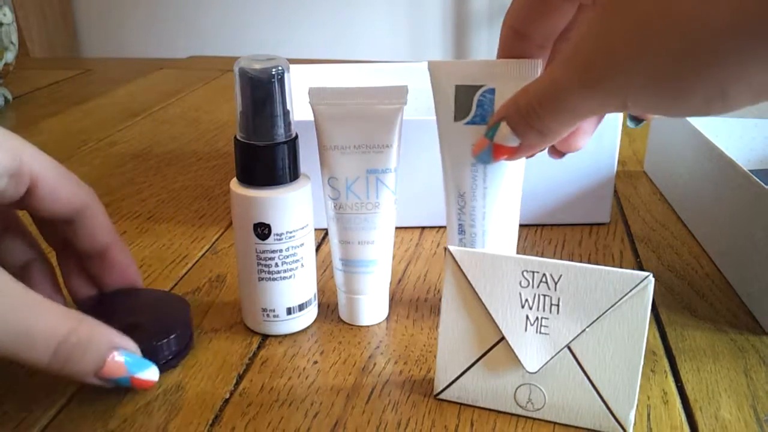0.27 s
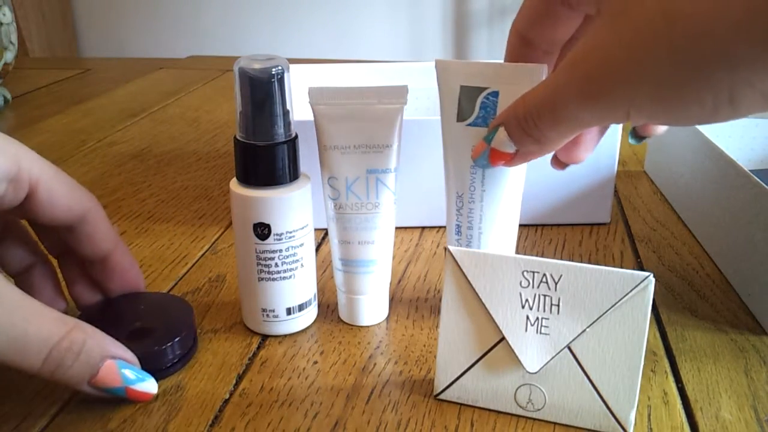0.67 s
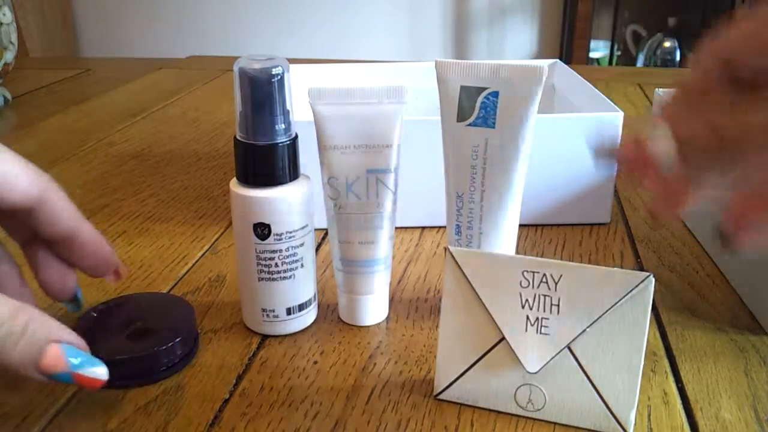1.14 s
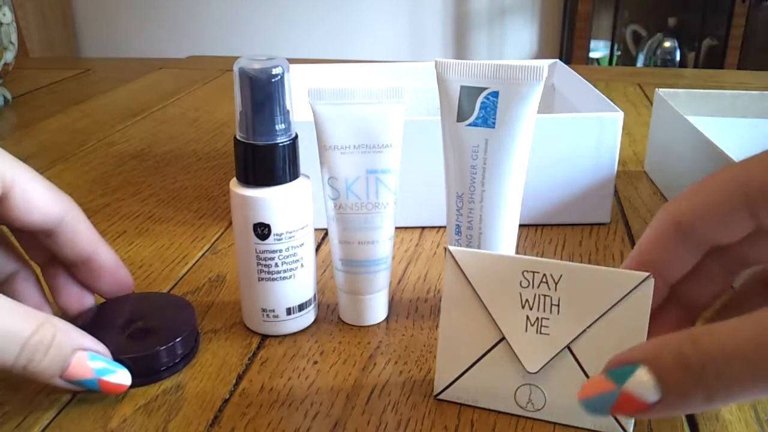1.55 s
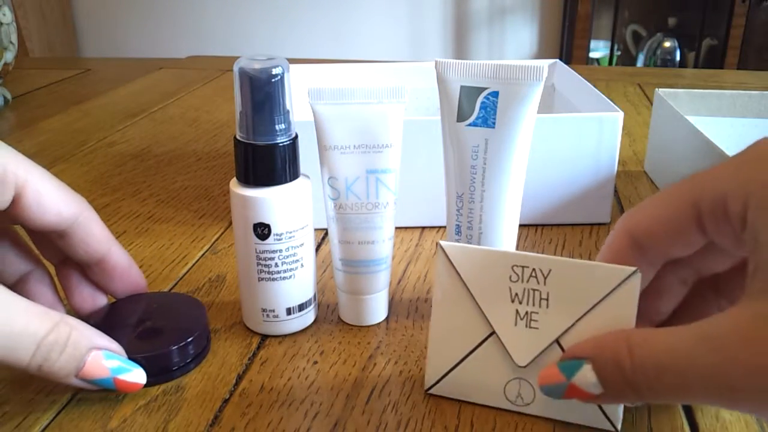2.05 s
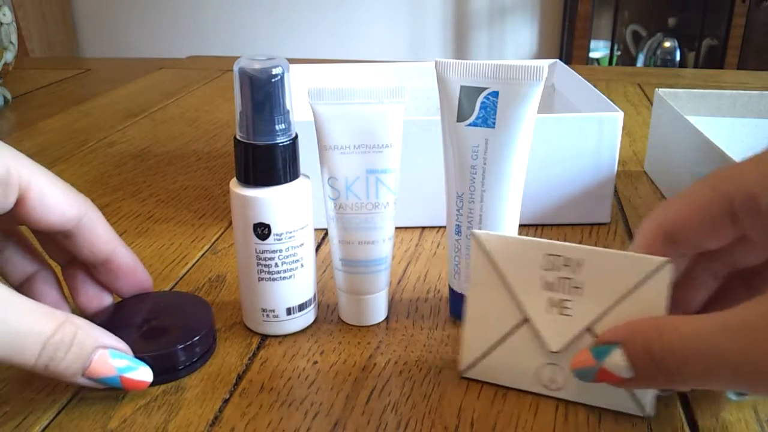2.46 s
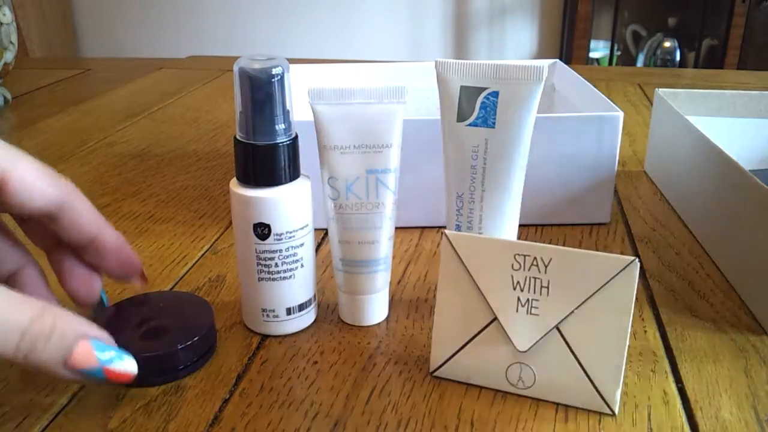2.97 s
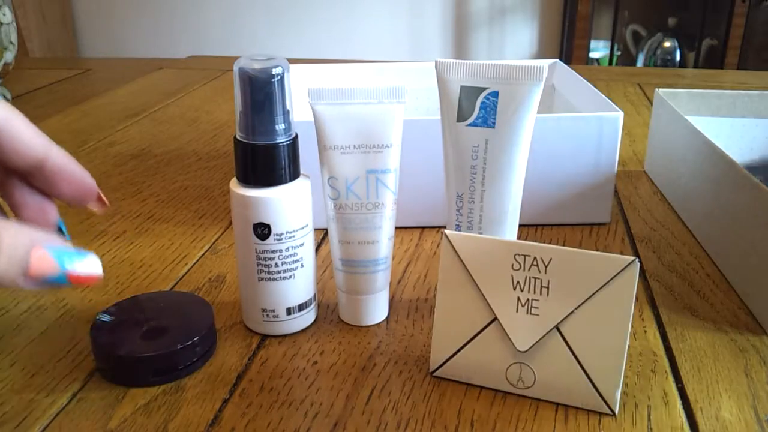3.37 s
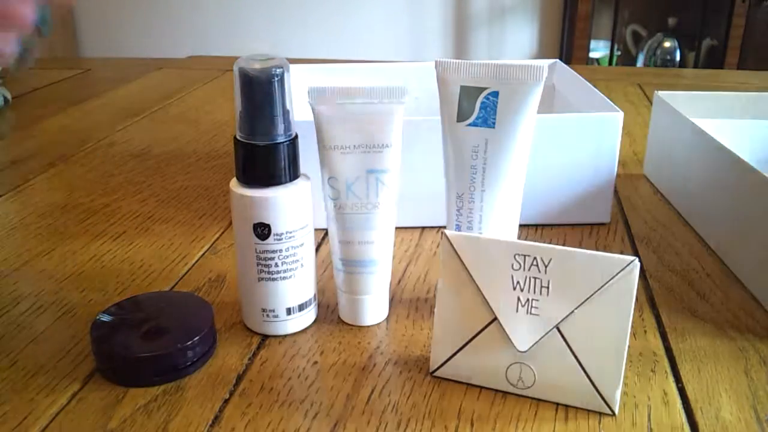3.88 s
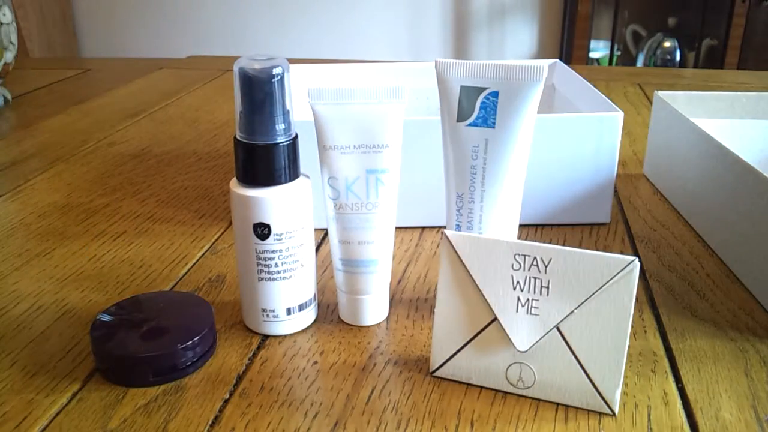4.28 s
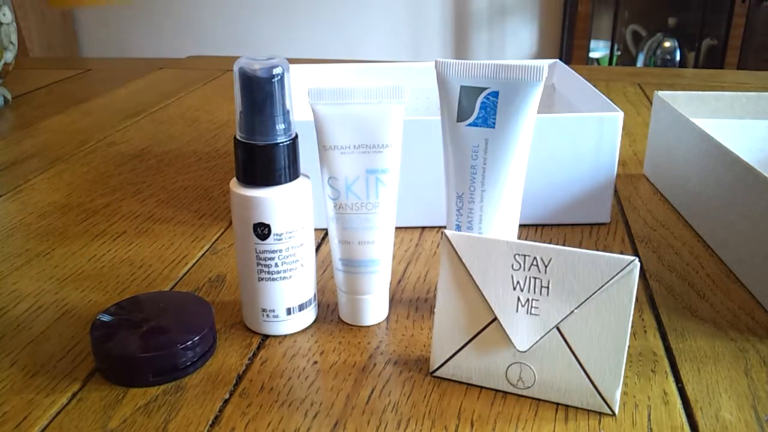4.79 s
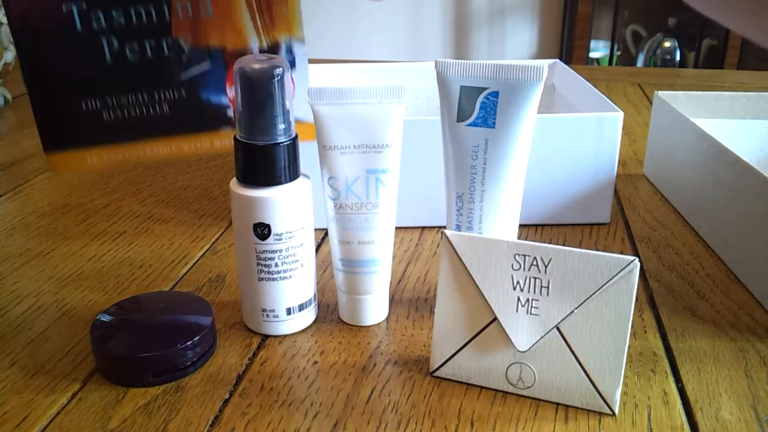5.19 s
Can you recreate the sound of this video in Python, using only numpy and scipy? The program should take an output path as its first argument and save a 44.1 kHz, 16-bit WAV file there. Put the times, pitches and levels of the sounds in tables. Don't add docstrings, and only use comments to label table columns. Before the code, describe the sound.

Close to the microphone, hands handle plastic and card on a wooden table. A sharp plastic clack comes first, then near quiet with faint slides and small taps. Midway, a busy burst of hollow card knocks and scraping peaks in a very loud dry snap, then fades into rustle, a knock and light clicks. Short room echo, steady hum and hiss, faint high ticking.

```python
import sys
import numpy as np
from scipy import signal
from scipy.io import wavfile
from scipy.ndimage import uniform_filter1d, minimum_filter1d

SR = 44100
rng = np.random.default_rng(int(sys.argv[2]) if len(sys.argv) > 2 else 0)


def natural_amplitude(level_db):
    exponent = np.asarray(level_db, float) / 20
    return 10 ** exponent


def generate_wav(signal):
    frames = np.transpose(np.atleast_2d(signal))
    scaled = np.clip(frames, -1, 1) * 32767
    pcm = np.round(scaled).astype(np.int16)
    wavfile.write(sys.argv[1], SR, pcm)


N = 240034

# (frequency [Hz], level [dB per Hz])
LEFT_FLOOR = [(25, -103), (70, -102), (160, -76.5), (280, -75), (450, -87), (700, -89.5), (1200, -94.5),
              (3000, -96), (6000, -103.5), (9000, -98), (11400, -93.5), (13500, -97.5), (15000, -100)]
RIGHT_FLOOR = [(25, -101), (70, -92.5), (160, -86), (280, -82.5), (450, -84.5), (700, -88.5), (1500, -91.5),
               (4000, -95.5), (6300, -91.5), (8500, -94.5), (15000, -94.5)]
# (frequency [Hz], likeness [-1 to 1])
FLOOR_LIKENESS = [(60, 0.38), (150, -0.57), (380, -0.47), (950, -0.039), (2380, 0.034), (5980, -0.0085),
                  (15000, -0.029)]
# (frequency [Hz], width [Hz], level [dB])
RIGHT_HUMPS = [(5550, 410, 3.5), (8000, 690, 1.5), (12000, 1400, 2)]
# (time [s], peak [dB], pitch [Hz])
STRONG_TICKS = [(0.116, -47, 12100), (0.1625, -51, 11800), (0.211, -50, 12000), (0.3252, -48, 11900),
                (0.3485, -45, 11700), (0.5343, -47, 11900), (0.5572, -47, 11600), (0.6037, -47, 12100),
                (0.72, -48, 12000), (0.8359, -57, 12000), (0.9287, -47, 11800), (0.9754, -46, 11700),
                (0.9983, -48, 11900), (1.3004, -52, 11900), (1.3468, -56, 11900), (1.4398, -50, 11900),
                (1.4899, -52, 12000), (1.5093, -47, 11900), (1.5326, -50, 11700), (1.5789, -45, 11900),
                (1.6025, -54, 11700), (1.6261, -51, 12000), (1.6486, -49, 12000), (1.6737, -45, 12200),
                (1.6955, -49, 11700), (1.8113, -54, 12200), (1.8615, -51, 11900), (1.904, -51, 11800),
                (1.9333, -49, 11900), (1.9506, -47, 11900), (1.9737, -48, 11700), (2.2726, -50, 12100),
                (2.8343, -54, 12100), (2.9967, -48, 12200), (3.1347, -49, 12100), (3.4901, -43, 12000),
                (3.817, -49, 11900), (4.042, -43, 11600), (4.2029, -52, 12300), (4.4118, -46, 11800),
                (4.4354, -49, 11600), (5.2526, -47, 12300), (5.2712, -45, 11900), (5.2941, -47, 11800),
                (5.3173, -48, 12100), (5.3448, -50, 12200), (5.4139, -48, 12000)]
# (frequency [Hz], gain [dB])
LEFT_PORT = [(50, -8), (130, 6), (300, 4), (700, 0), (2500, 0.5), (4000, -2), (5600, -8), (7000, -2.5),
             (9000, 0), (11800, 14), (14500, 3)]
RIGHT_PORT = [(50, -17), (130, -0.5), (300, -11), (700, -0.5), (2500, 0.5), (4000, 3.5), (4600, 6),
              (5050, 8), (5600, 7), (6300, 4), (9000, -6.5), (11600, 0), (14500, -14.5)]
# (frequency [Hz], time to fall 60 dB [s])
ROOM_DECAY = [(200, 0.11), (600, 0.33), (2000, 0.51), (5000, 0.18), (12000, 0.019)]
# (delay [s], level [dB])
ECHOES = [(.0042, -3.5), (.0085, -35), (.0125, -11), (.0155, -33), (.021, -14), (.027, -15.5)]
# (start [s], length [s], pitch [Hz], level [dB], steadiness [ratio])
SQUEAKS = [(1.17, 0.26, 3050, -66, .1), (2.45, 0.17, 5000, -63, .1), (3.325, 0.031, 4070, -46.5, .3),
           (3.488, 0.09, 2600, -46, .1), (3.49, 0.16, 5060, -46, .1), (4.538, 0.1, 3200, -62, 1.2),
           (4.499, 0.13, 5250, -67, .3), (4.6, 0.16, 3110, -53.5, 1.3), (4.626, .025, 5300, -54.5, .5),
           (4.741, 0.09, 3200, -58, 1.5), (4.632, .035, 3150, -53, 2), (4.77, .17, 2050, -59, .1),
           (2.08, 0.4, 7000, -62, .1)]
# (frequency [Hz], level [dB])
SCRAPE_COLOUR = [(1200, -1), (1700, 1.5), (2300, 1), (3100, 1), (4200, -0.5), (5000, -2), (5900, -4.5),
                 (7000, -4), (9000, -4), (12000, -43)]
BODY_COLOUR = [(90, -50), (150, -28), (300, -4.5), (500, -4.5), (900, -11.5), (1400, -11), (2200, -14)]
SHEEN_COLOUR = [(5000, -23), (8000, -2.5), (10000, -4), (12000, -4.5), (15000, -3.5)]
# (start [s], length [s], scrape [dB], body against scrape [dB], sheen against scrape [dB])
SLIDES = [(.4, 0.23, -64.5, 1, -3), (0.845, 0.62, -67, 6, -14), (2.048, 0.34, -64, -4, -6),
          (2.9, .28, -63, -1, -3), (2.409, 0.16, -55.5, 5, -3), (2.497, .13, -58, 4.5, -3),
          (3.19, 0.14, -44.5, 1, -7), (3.306, 0.19, -41.5, -5.5, -3.5), (3.406, 0.12, -43, -9, -4.5),
          (3.536, 0.15, -44.5, -13, 3), (3.66, 0.1, -47, -8, 3), (3.768, 0.31, -59, -1.5, -0.5),
          (4.013, 0.21, -60, -3.5, 3), (4.46, 0.15, -58, -6, -6), (4.56, 0.15, -49, -14, 1.5),
          (4.69, 0.21, -56.5, -4, -21), (4.848, 0.16, -59, -10, -14)]
# (start [s], time to fall 60 dB [s], scrape [dB], body against scrape [dB], sheen against scrape [dB])
SKIDS = [
    (0.308, 0.42, -44, -0.5, -5),
    (3.483, 0.17, -41, -23, 13),
    (3.487, 0.7, -31, -34, -6),
    (3.72, 0.18, -37, 3.5, -2.5),
    (4.39, 0.76, -50, -6, -1),
]
# (frequency [Hz], width [Hz], level [dB])
ITEM_MODES = [(2250, 270, 3), (3500, 260, -15), (2940, 120, -4), (1880, 170, 5), (1000, 360, 0),
              (465, 460, 2.5), (650, 38, 3.5), (1365, 120, 4.5)]
# (time [s], peak [dB], centre [Hz], rattle time to fall 60 dB [s], left over right [dB])
KNOCKS = [(0.3015, -32, 815, 0.033, 5), (.331, -38, 362, 0.19, -4), (2.3696, -39.5, 492, 0.021, -5),
          (2.555, -41.5, 710, 0.035, 0), (3.2141, -18.5, 1160, 0.0034, 3), (3.2225, -28, 810, 0.022, 0),
          (3.246, -36, 412, 0.12, -3), (3.371, -22.5, 1130, 0.094, 6), (3.463, -21.5, 1240, 0.062, 4.5),
          (3.72, -27, 920, 0.051, 7), (3.731, -34, 500, 0.04, -4), (3.749, -37, 360, 0.037, -4),
          (4.084, -46, 760, 0.025, 0)]
# (time [s], peak [dB], centre [Hz], width [octaves], left over right [dB])
CLICKS = [(0.2571, -32, 2370, 2, 4), (0.2981, -19, 3500, 2.9, -4), (.5335, -50, 7000, 0.37, -15),
          (0.6127, -45, 8000, 0.34, -17), (2.371, -33, 1880, 1.6, 2), (2.555, -40, 2000, 1.1, 4),
          (2.7534, -36.5, 1800, 1.7, 4.5), (3.2147, -31, 3990, 0.6, -8.5), (3.2382, -23, 3600, 1.34, -5),
          (3.278, -33, 3000, 0.78, 5), (3.371, -26, 4000, 1.7, -18), (3.383, -20.5, 2500, 2, -6),
          (3.466, -27, 4700, 0.31, -3), (3.4776, -22, 4960, 0.9, -1), (3.4792, -12.5, 5150, 0.8, -13),
          (3.4803, -26, 200, 1.9, -7.5), (3.4806, -9, 5250, 2.8, 8), (3.489, -28.5, 2630, 0.94, 27),
          (3.493, -17.5, 4020, 0.87, 16), (3.8953, -38, 3370, 0.38, -3), (3.911, -30.5, 3000, 3.4, -8),
          (4.042, -44, 11600, .55, -7), (4.3867, -32, 3000, 1.4, 3), (4.4203, -31.5, 3600, 0.92, 4),
          (4.4108, -42, 4500, 1.1, 1), (4.4972, -34, 3800, 1.33, -4), (4.5512, -41, 10600, .3, -2),
          (4.617, -32, 4200, 1.3, -3)]
# (time [s], peak [dB], pitch [Hz], left over right [dB])
PINGS = [(0.306, -38, 2250, 6), (.307, -42, 5700, -3), (0.312, -31, 1950, 11), (0.3139, -40, 950, 3),
         (.3185, -41, 900, -3), (.349, -44, 2100, 3), (.3772, -44, 1870, 2), (0.381, -43, 1900, 4),
         (.415, -50, 1900, -2), (0.32, -36, 7900, .8), (.3245, -38, 2200, 3), (.328, -37, 2150, 5),
         (.338, -37, 2200, 3), (2.3702, -51, 5100, -2), (2.753, -45, 2770, 2), (2.7527, -48, 5710, 8),
         (3.238, -30, 2240, -2), (3.2381, -40, 4870, -2), (3.2385, -32.5, 3170, -9), (3.238, -43, 5700, 0),
         (3.2773, -40, 4100, 0), (3.2784, -41, 2180, 0), (3.406, -34, 6450, -9), (3.4083, -31, 6300, -8),
         (3.409, -42, 11900, 3), (3.4348, -35, 5820, -8), (3.4356, -31.5, 5600, -11),
         (3.4353, -34, 11300, 0), (3.8945, -36, 4090, -7), (4.084, -46, 780, 6), (4.3888, -38, 1550, -1),
         (4.4206, -38, 4880, -2), (4.4208, -43, 3400, 1), (4.4972, -45, 3000, 4), (4.6172, -47, 2000, 4),
         (2.7532, -44, 1600, 4), (2.3703, -41, 2310, 2), (2.3705, -43.5, 1290, 2), (3.912, -45, 1100, 3),
         (4.4968, -41, 5400, -5)]
# (time [s], peak [dB], pitch
# [Hz], time to fall 60 dB [s], left over right [dB])
BUMP_RINGS = [(3.2875, -40, 402, .035, 3), (3.303, -43, 380, .05, 3), (2.37, -42, 427, 0.022, 3),
              (2.3821, -44, 392, 0.041, 1), (2.757, -46, 485, 0.017, 0), (3.2142, -21, 950, 0.012, -4),
              (3.215, -40, 1390, 0.012, 7), (3.2144, -27.5, 745, 0.019, -2), (3.2144, -32, 2100, 0.012, -3),
              (3.2185, -24, 1000, .012, -5), (3.249, -37, 254, 0.093, -3), (3.3712, -27, 800, .012, -4),
              (3.3715, -30, 1960, .012, -3), (3.373, -37.5, 266, 0.056, -2), (3.3727, -19, 477, 0.02, 2),
              (3.3735, -22, 1300, .016, -6), (3.3713, -21.5, 1075, .02, -2), (3.3825, -30, 1990, .02, 3),
              (3.3836, -32, 2450, 0.033, 3), (3.3828, -29, 1260, 0.018, 3), (3.386, -30, 470, 0.019, -1),
              (3.391, -31, 1000, 0.028, -1), (3.396, -30, 480, 0.027, -5), (3.41, -33, 1690, .025, 7),
              (3.4636, -26, 1193, .025, 9), (3.4632, -29, 2100, .012, 2), (3.4667, -22.5, 1160, 0.029, 2),
              (3.467, -28, 1770, 0.017, 3), (3.7194, -30, 1230, 0.0077, 10), (3.7215, -26, 652, 0.034, -12),
              (3.7204, -24, 1050, 0.018, 5.5), (3.7255, -32, 520, .025, 6), (3.7245, -30, 845, .015, 1),
              (3.725, -44, 258, 0.1, -2.5), (3.729, -30, 705, 0.017, 0), (3.7315, -29.5, 445, 0.041, 0),
              (3.7284, -26.5, 1150, .015, 5), (3.7336, -25, 1220, 0.012, 1), (3.7344, -37, 1574, 0.025, 9),
              (3.7499, -36.5, 400, .025, -2),
              (.298, -39, 330, .015, 2),
    (.3008, -32, 900, 0.014, 4),
    (0.3307, -41, 380, .025, 4),
    (.3365, -39, 420, .02, 2),
    (0.3442, -44, 370, 0.051, 4),
    (.364, -49, 400, 0.036, 2),
]
# (pitch [Hz], peak [dB], time to fall 60 dB [s], left over right [dB])
CASE_MODES = [(626, -35.5, 0.014, 6), (1030, -28, 0.0093, 0), (1680, -28, 0.012, 3),
              (2345, -23.5, 0.016, 4.5), (2830, -29.5, .013, -8), (3630, -21, 0.0081, -0.5),
              (4560, -25, 0.014, 3), (5200, -19.5, 0.0082, 6), (5860, -28, 0.0087, 0),
              (6750, -26, 0.008, 4), (7640, -27.5, .008, 7), (10350, -34.5, 0.0057, 3),
              (11570, -35, 0.0057, 1), (13200, -44, .004, 0)]
# (pitch [Hz], peak [dB], time to fall 60 dB [s], left over right [dB])
SNAP_MODES = [(1007, -19.5, 0.021, 0), (1350, -29, 0.012, 8), (2237, -8, 0.016, 3), (2920, -20, 0.017, -6),
              (3540, -15.5, 0.012, -10), (4150, -15.5, 0.014, -8), (4950, -7, 0.0082, -5),
              (5710, -16.5, 0.016, -4), (9480, -19, 0.0058, 3), (11540, -20, 0.0093, 2.5),
              (11800, -27, .009, -2), (12600, -22, 0.0089, 4)]


def evened(x):
    return x / np.sqrt(np.mean(x ** 2) + 1e-20)


def read(points, hz):
    f, value = np.transpose(points)
    return np.interp(np.log(hz + 1), np.log(f + 1), value)


def causal(gain_db):
    log_gain = np.log(natural_amplitude(np.maximum(gain_db, -100)))
    full = np.concatenate([log_gain, log_gain[-2:0:-1]])
    return np.fft.ifft(np.exp(np.conj(signal.hilbert(full)))).real[:1024]


def colour(x, points):
    gain_db = read(points, np.fft.rfftfreq(2048, 1 / SR))
    return signal.oaconvolve(x, causal(gain_db))[:len(x)]


def add(mix, s, sound):
    part = mix[:, round(s * SR):][:, :sound.shape[1]]
    part += sound[:, :part.shape[1]]


def sides(pan_db):
    return natural_amplitude([[pan_db / 2], [-pan_db / 2]])


def ring(db, hz, t60, pan_db):
    t = np.arange(4096) / SR
    rise_s = 0.00026 + 0.52 / hz
    swell = 1 - np.exp(-(t / rise_s) ** 2)
    shape = swell * natural_amplitude(-60 * t / max(t60, .002))
    return natural_amplitude(db) * shape / shape.max() * np.sin(2 * np.pi * hz * t) * sides(pan_db)


def floor():
    patchy_db = 0.8
    frames, hz = N // 256 + 5, np.fft.rfftfreq(1024, 1 / SR)
    a, b, c, d, patches = rng.standard_normal((frames, 513, 5)).T
    patches = evened(uniform_filter1d(uniform_filter1d(patches, 12, 0), 14, 1))
    same = np.clip(read(FLOOR_LIKENESS, hz), -1, 1)[:, None]
    left = a + 1j * b
    right = same * left + np.sqrt(1 - same ** 2) * (c + 1j * d)
    level_db = np.array([read(LEFT_FLOOR, hz), read(RIGHT_FLOOR, hz)])[:, :, None]
    z = np.array([left, right]) * natural_amplitude(level_db + 17 + patchy_db * patches)
    humps_db = sum(db / (1 + (2 * (hz - f) / width) ** 4) for f, width, db in RIGHT_HUMPS)
    z[1] *= natural_amplitude(humps_db)[:, None]
    return signal.istft(z, nperseg=1024, noverlap=768)[1][:, :N]


def high_ticks():
    first_s, every_s = 0.0232, 1024 / SR
    faint_db, spread_db, faint_hz = -49.5, 4.5, 11900
    out, steps = np.zeros((2, N)), np.arange(first_s, N / SR, every_s)
    chance = rng.standard_normal((len(steps), 2))
    rows = [(s, db + 6.5, hz) for s, db, hz in STRONG_TICKS]
    for s, (a, b) in zip(steps, chance):
        rows.append((s, faint_db + spread_db * a, faint_hz * (1 + 0.024 * b)))
    for s, db, hz in rows:
        add(out, s, ring(db, hz, 0.0043, 0)[:, :512])
    return out * [[0], [1]]


def room(x, wet_db=-18, echo_db=-14):
    size = SR // 2
    reflections = np.zeros((2, size))
    at = np.arange(240, size - 20, 20) + rng.integers(0, 20, (2, (size - 241) // 20))
    np.put_along_axis(reflections, at, rng.choice([-1., 1.], at.shape), 1)
    hz, t, z = signal.stft(reflections, SR, nperseg=256)
    fade = natural_amplitude(-60 * t / read(ROOM_DECAY, hz)[:, None])
    tail = signal.istft(z * fade, SR, nperseg=256)[1][:, :size]
    tail *= natural_amplitude(wet_db) / np.linalg.norm(tail[0])
    for s, db in ECHOES:
        delay = round(s * SR) + rng.integers(-20, 20, 2)
        tail[[0, 1], delay] += natural_amplitude(db + echo_db) * rng.choice([-1, 1], 2)
    tail[[0, 1], [4, 0]] += 1
    return signal.fftconvolve(x, tail, axes=1)[:, :N]


def squeak(start, length, hz, db, steady):
    width_hz, glide_hz_per_s = 260, 600
    t = np.arange(0, length, 1 / SR)
    turn = np.exp(2j * np.pi * np.cumsum(hz + glide_hz_per_s * t) / SR)
    r = np.exp(-np.pi * width_hz / SR)
    a, b = signal.lfilter([1 - r], [1, -r], rng.standard_normal((2, SR // 2)))[:, :len(t)]
    tone = evened((turn * (steady + evened(a) + 1j * evened(b))).real)
    arch = np.sin(np.pi * t / length) ** 0.5
    return start, tone * natural_amplitude(db) * arch * natural_amplitude([[-4], [1.5]])


def pressure():
    t, power = np.arange(N) / SR, np.zeros((3, N))
    for start, length, db, body_db, sheen_db in SLIDES:
        arch = np.sin(np.pi * np.clip((t - start) / length, 0, 1)).clip(0) ** 0.93
        arch = arch * (t < start + length)
        power += (natural_amplitude(db + np.array([[0], [body_db], [sheen_db]])) * arch) ** 2
    for start, t60, db, body_db, sheen_db in SKIDS:
        since = np.maximum(t - start, 0)
        fade = np.minimum(since / 0.0086, 1) * natural_amplitude(-60 * since / t60)
        power += (natural_amplitude(db + np.array([[0], [body_db], [sheen_db]])) * fade) ** 2
    return np.sqrt(power)


def rubs(grains_per_s=6000, spread_db=4.0, smooth=2, flutter_db=1.1):
    slips = natural_amplitude(spread_db * np.minimum(rng.exponential(1, N), 5))
    slips = slips * (rng.random(N) < grains_per_s / SR)
    drive = (evened(slips) + smooth) * rng.standard_normal((3, 2, N))
    flutter = uniform_filter1d(uniform_filter1d(rng.standard_normal((3, 1, N)), 250), 250)
    drive *= natural_amplitude(flutter_db * evened(flutter))
    colours = [(400, -44)] + SCRAPE_COLOUR, BODY_COLOUR + [(5000, -72)], SHEEN_COLOUR
    layers = [evened(np.array([colour(x, c) for x in pair])) for pair, c in zip(drive, colours)]
    return sum(level * layer for level, layer in zip(pressure(), layers))


def tap(db, hz, octaves, t60, pan_db, blow=2.3, unlike=0.51):
    f, t = np.fft.rfftfreq(2048, 1 / SR) + 1, np.arange(4096) / SR
    shared, left, right = rng.standard_normal((3, 4096))
    rattle = shared + unlike * np.array([left, right])
    rattle *= natural_amplitude(-60 * t / max(t60, .002)) * np.minimum(t / 0.00098, 1)
    rattle[:, 12] += blow * 2
    band = natural_amplitude(-6 * (np.log2(f / hz) / max(octaves, .1)) ** 2)
    modes = 1 + sum(natural_amplitude(m_db) / (1 + (2 * (f - m_hz) / width) ** 2) for m_hz, width, m_db in ITEM_MODES)
    body = causal(20 * np.log10(band * modes + 1e-4))
    sound = signal.fftconvolve(rattle, body[None], axes=1)
    return natural_amplitude(db) * sound / abs(sound).max() * sides(pan_db)


def clicks_and_knocks():
    out = np.zeros((2, N))
    for s, db, hz, octaves, pan_db in CLICKS:
        add(out, s - 12 / SR, tap(db, hz, octaves, 0.019, pan_db))
    for s, db, hz, t60, pan_db in KNOCKS:
        add(out, s - 12 / SR, tap(db, hz, 0.49, t60, pan_db))
    return out


def ringing_bodies():
    out = np.zeros((2, N))
    case_s, snap_s = 0.2977, 3.4799
    for s, db, hz, pan_db in PINGS:
        t60 = 0.011 * (hz / 4000) ** -0.41
        add(out, s, ring(db, hz, t60, pan_db))
    for s, modes in [(case_s, CASE_MODES), (snap_s, SNAP_MODES)]:
        for hz, db, t60, pan_db in modes:
            add(out, s, ring(db, hz, t60, pan_db))
    for s, *row in BUMP_RINGS:
        add(out, s, ring(*row))
    return out


def scene():
    air = room(clicks_and_knocks() + ringing_bodies()) + rubs()
    for row in SQUEAKS:
        add(air, *squeak(*row))
    ports = np.array([colour(air[0], LEFT_PORT), -colour(air[1], RIGHT_PORT)])
    return ports + floor() + high_ticks()


def roll_off(x):
    return signal.sosfilt(signal.butter(12, 15800, fs=SR, output="sos"), x)


def record(dry, knee_db=-38, slope=8.4, split_hz=170):
    bass = signal.sosfiltfilt(signal.butter(4, split_hz, fs=SR, output="sos"), dry)
    power_db = 10 * np.log10(abs(uniform_filter1d((dry ** 2).mean(0), 400)) + 1e-12)
    lasting_db = minimum_filter1d(power_db, size=1800, origin=850)
    cut_db = np.clip(slope * (lasting_db - knee_db), 0, 26)
    wet = dry - bass * (1 - natural_amplitude(-uniform_filter1d(cut_db, 600)))
    wet = wet + 0.056 * wet ** 4
    band_limit = signal.firwin(301, 14550, window=("kaiser", 8), fs=SR)
    low = signal.oaconvolve(wet, band_limit[None], "same")
    wide = signal.sosfiltfilt(signal.butter(8, 15900, fs=SR, output="sos"), wet)
    quick = abs(uniform_filter1d((wet ** 2).mean(0), size=128))
    sudden = quick > 16 * np.roll(abs(uniform_filter1d(quick, size=900)), 600)
    opening = uniform_filter1d(1. * sudden, size=200)
    mix = low + natural_amplitude(-7) * (wide - low) * opening
    return roll_off(np.clip(mix, -1, 1))


dry = scene()
out = record(dry)
generate_wav(out)
```